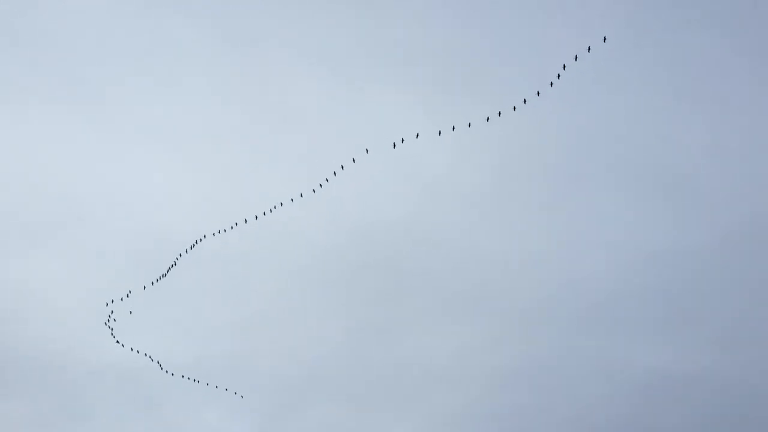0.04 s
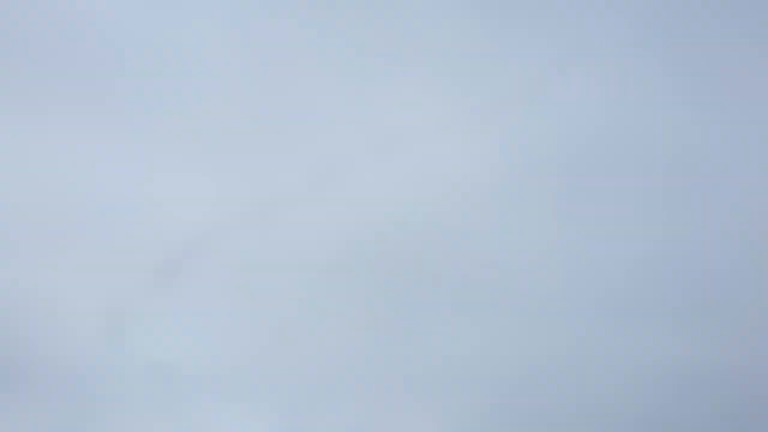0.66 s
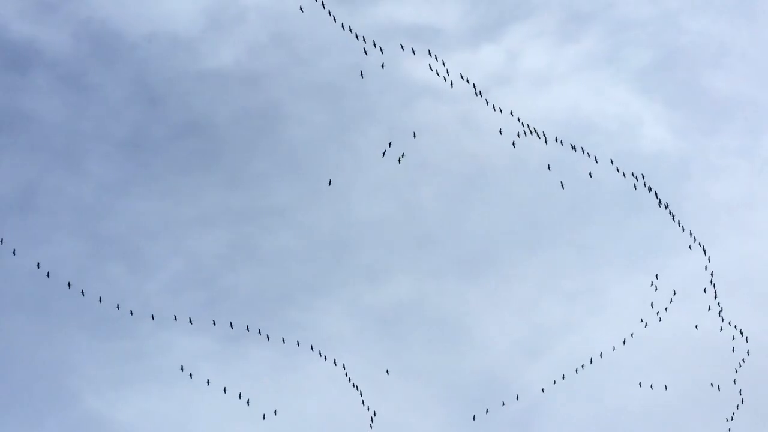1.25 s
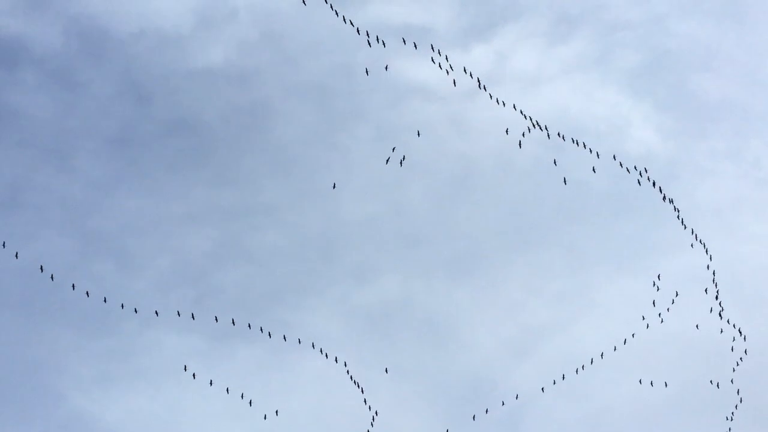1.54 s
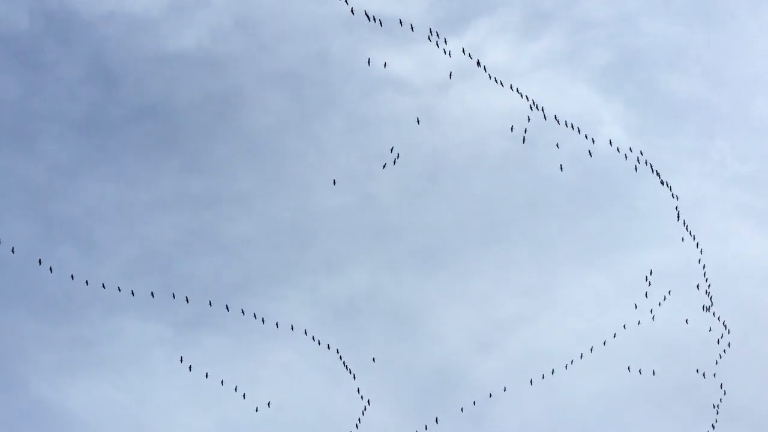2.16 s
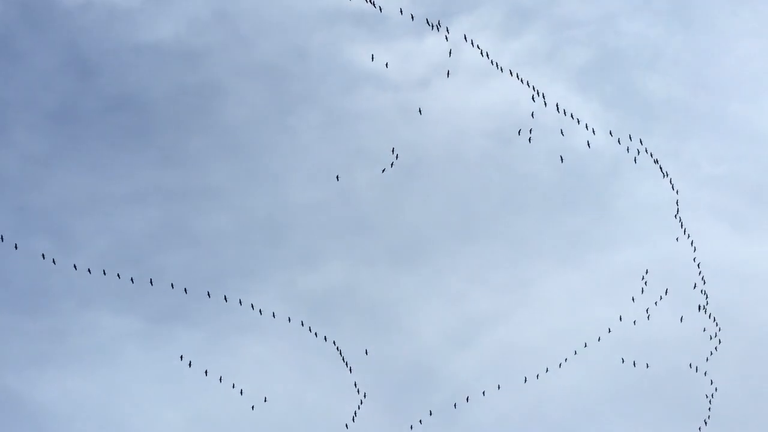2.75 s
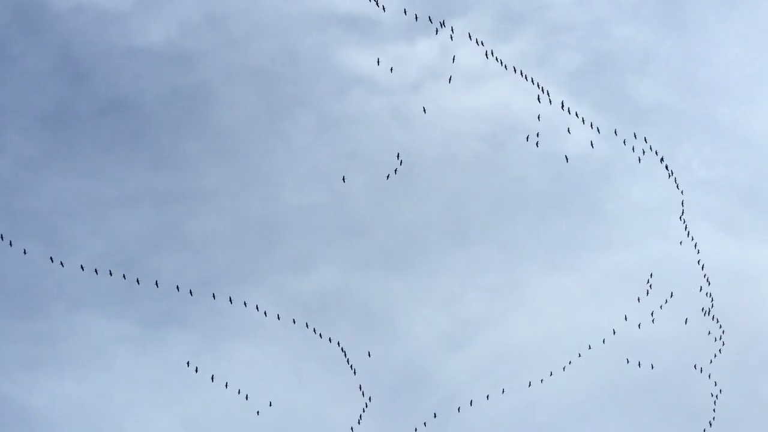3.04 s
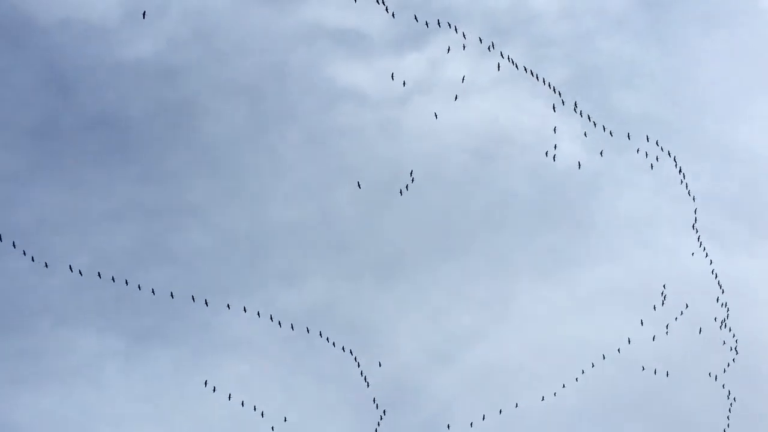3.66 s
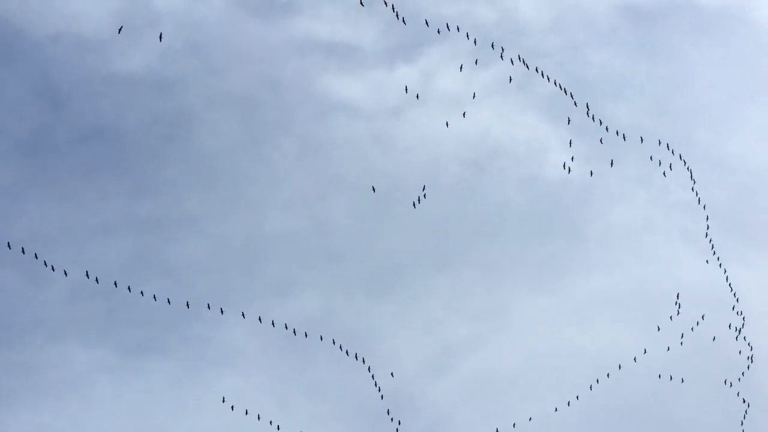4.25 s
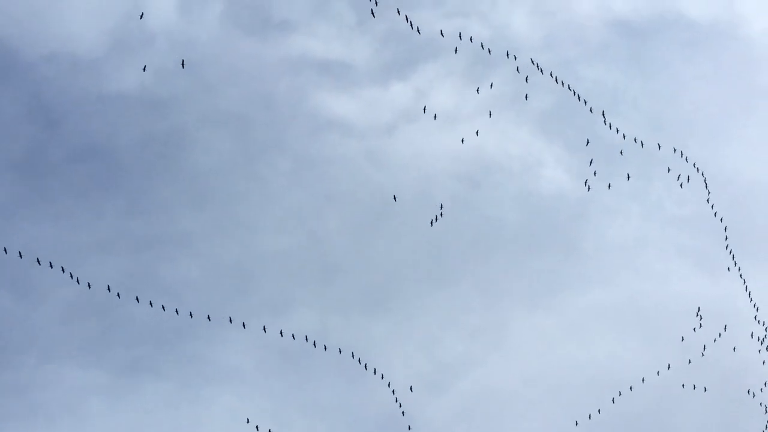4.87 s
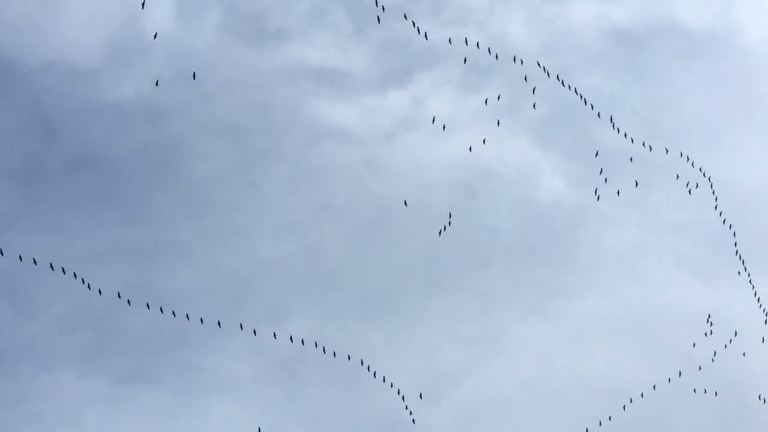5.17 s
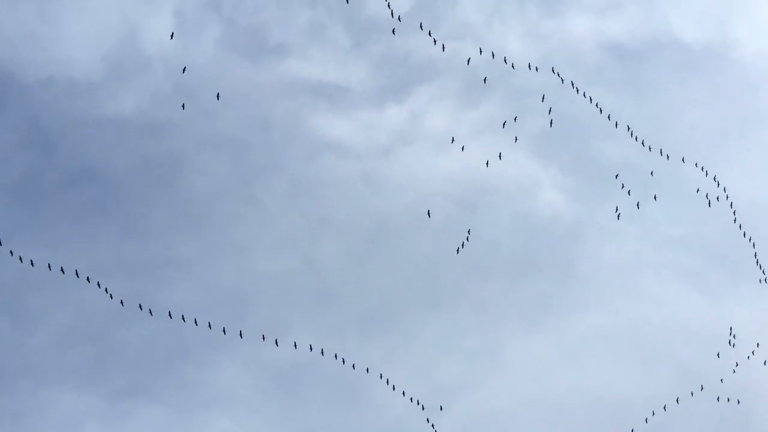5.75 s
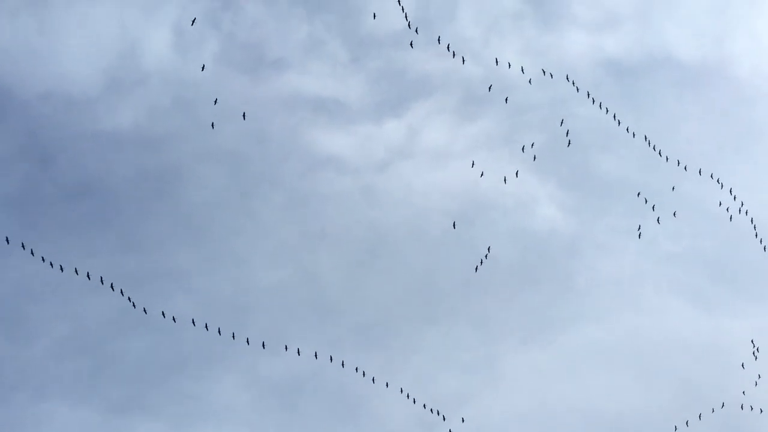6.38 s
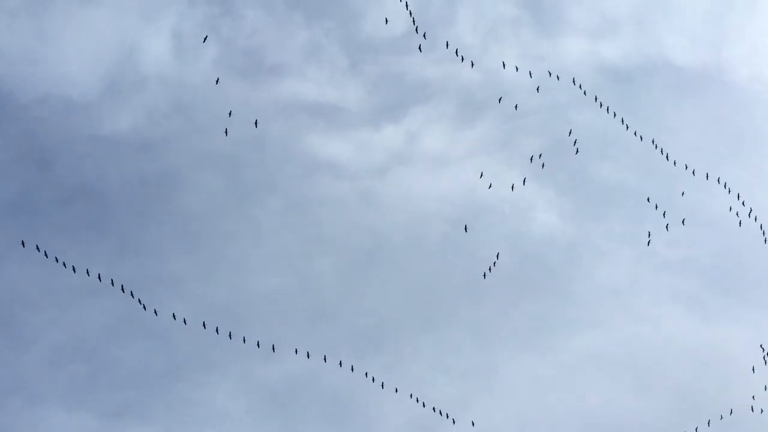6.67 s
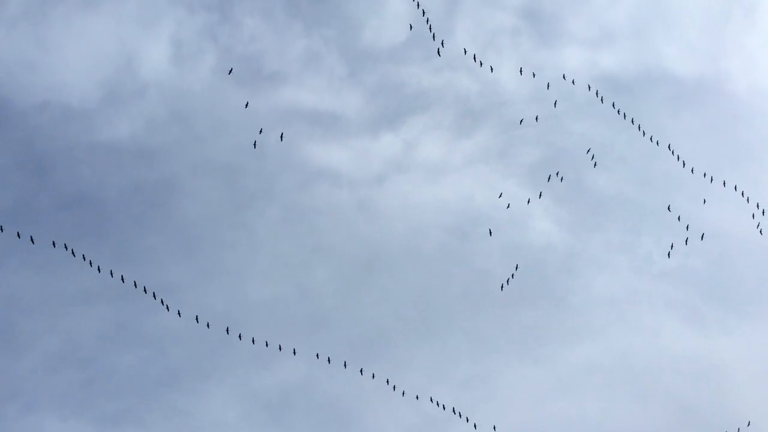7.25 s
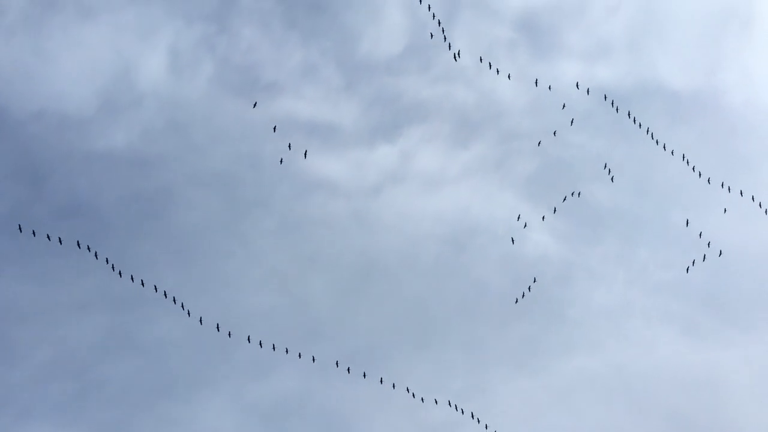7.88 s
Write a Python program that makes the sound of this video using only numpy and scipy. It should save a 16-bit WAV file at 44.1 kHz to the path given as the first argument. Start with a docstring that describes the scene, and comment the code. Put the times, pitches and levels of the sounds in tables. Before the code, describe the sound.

Heard from the ground outdoors, distant cranes trumpet over a low rumble of light wind, a faint engine hum and a steady airy hiss. Soft, slightly falling honks come first, then short rattling rolls and sharp yelps join in uneven bursts, with occasional faint, high peeps. The far flock forms a blurred chorus that rises and falls, and the calling becomes busier in the second half.

```python
"""Cranes trumpet high overhead: gliding honks, quick rolls and lone yelps, with the thin whistles of
young birds between them. Each adult call is a buzz of membranes in the syrinx, coloured by the
windpipe, and frays into rasp when they flap unevenly. The far flock blurs into a chorus and the land
returns a faint echo. Light wind, a distant engine drone and a soft hiss lie underneath."""
import sys
import numpy as np
from scipy import signal
from scipy.fft import rfft, irfft, next_fast_len
from scipy.io import wavfile

SR = 44100
rng = np.random.default_rng(int(sys.argv[2]) if len(sys.argv) > 2 else 0)


def store_pcm(level_fs):
    """Save levels as 16-bit WAV."""
    pcm = np.round(np.clip(level_fs, -1, 1) * 32767).astype(np.int16)
    wavfile.write(sys.argv[1], SR, np.atleast_2d(pcm).T)


N = 349272
TIME = np.arange(N) / SR

# Honks of the nearer birds. Each row: start in seconds, length in seconds, top pitch in Hz, closing
# fall as a share of pitch, roughness from 0 to 1, level in dB, second and upper harmonics in relative
# dB, windpipe resonance in Hz.
HONK_CUES = [(0.0, 0.15, 1060, 0.052, 0.54, -51, -19.5, -29, 3200),
             (0.247, 0.099, 1034, 0.055, 0.42, -48.5, -25, -31, 3200),
             (0.361, 0.22, 1010, 0.065, .5, -50, -32, -33, 3100),
             (.378, .22, 927, .08, 0.6, -53, -14, -27, 3000),
             (.47, 0.13, 825, 0.039, 0.13, -52.5, -15, -30, 3200),
             (.585, 0.18, 817, 0.048, 0.23, -54, -7.5, -26.5, 3470),
             (0.762, 0.16, 788, 0.058, 0.6, -57, -16, -26, 3260),
             (0.818, 0.32, 1008, 0.072, 0.64, -54, -38, -25, 3200),
             (1.114, 0.038, 790, .11, .35, -57, -18, -17.5, 3100),
             (1.308, 0.083, 1212, .06, 0.53, -50.5, -34, -38, 3300),
             (1.332, 0.064, 871, 0.072, 0.27, -49, -5, -32, 3300),
             (1.381, 0.077, 793, 0.22, 0.4, -55, -16, -28, 3300),
             (1.617, 0.12, 881, 0.055, 0.9, -57, -6, -23, 3170),
             (1.706, 0.057, 766, 0.063, .2, -55.5, 1, -19.5, 3200),
             (1.953, 0.16, 767, 0.09, 0.7, -54.5, -3.5, -20.5, 3300),
             (2.054, 0.22, 1103, 0.075, .06, -37.5, -12.5, -25, 3550),
             (2.253, 0.055, 742, 0.22, 0.56, -54.5, -7, -24, 3200),
             (2.581, 0.084, 854, 0.018, 0.54, -52, -2.5, -12, 3100),
             (2.705, 0.091, 844, .08, 0.3, -54, -1.5, -5, 3150),
             (2.689, 0.098, 1079, 0.031, .4, -47, -30, -16, 3320),
             (2.957, 0.14, 1019, 0.018, 0.22, -50.5, -9.5, -20, 3840),
             (2.947, 0.13, 817, 0.12, 0.44, -51, -13, -29, 3300),
             (3.059, 0.12, 1093, 0.029, 0.5, -48.5, -12, -32, 3200),
             (3.05, 0.082, 846, 0.12, 0.6, -62, -5, -31, 3220),
             (3.145, 0.21, 1101, 0.078, 0.15, -39.5, -16, -24.5, 3100),
             (3.184, 0.087, 1010, .11, .08, -47, -8, -27, 3200),
             (4.033, 0.053, 925, 0.043, 0.6, -52, -7, -16, 3200),
             (4.251, 0.059, 952, 0.038, 0.26, -46.5, -3, -10.5, 2800),
             (4.284, 0.2, 1084, 0.04, 0.18, -45.5, -16, -24, 3320),
             (4.297, 0.21, 975, 0.053, 0.83, -48, -28, -23.5, 3140),
             (4.997, 0.097, 1005, .025, 0.07, -49.5, -4.5, -19, 3100),
             (5.124, 0.086, 881, 0.12, 0.42, -50.5, -3, -15, 3160),
             (5.486, .09, 1290, 0.044, 0.9, -50.5, -21, -20, 3300),
             (5.516, 0.27, 1103, 0.052, 0.25, -43.5, -19.5, -21.5, 3200),
             (5.557, 0.054, 905, .03, 0.3, -52, 8, -14, 3200),
             (5.625, 0.092, 948, 0.017, 0.6, -52.5, 0, -10, 3220),
             (5.708, 0.12, 1000, 0.044, 0.17, -49.5, -1, -35, 3300),
             (5.801, .125, 1031, 0.041, 0.37, -51.5, -8, -33, 3300),
             (5.913, 0.074, 1040, 0.144, 0.3, -48, -10.5, -27, 3880),
             (5.985, 0.065, 854, 0.048, 0.14, -52, -3, -18, 3200),
             (6.085, 0.11, 854, 0.045, 0.37, -53, -2, -22, 3300),
             (6.234, 0.098, 1025, 0.072, .3, -50, -15, -28, 3800),
             (6.263, 0.11, 876, 0.047, .4, -53, -11, -35, 3300),
             (6.581, 0.28, 1097, 0.039, .2, -48, -18, -15.5, 2950),
             (6.627, 0.083, 873, 0.12, 0.5, -53, -7, -18, 3200),
             (6.789, 0.13, 1051, 0.039, 0.4, -48, -19, -28, 3300),
             (6.86, 0.14, 1171, 0.043, 0.54, -50, -20, -29, 3270),
             (6.93, .15, 839, 0.034, 0.35, -54.5, -3, -28, 3300),
             (7.039, 0.15, 836, 0.18, 0.54, -49.5, -8.5, -26, 3230),
             (7.4, 0.051, 794, 0.045, 0.27, -52, -5.5, -17.5, 3360),
             (7.506, 0.065, 981, 0.038, 0.18, -41, -27, -37, 3330),
             (7.55, 0.05, 826, 0.15, 0.47, -53.5, -13, -18, 3300),
             (7.672, 0.089, 1086, 0.013, 0.48, -38.5, -21, -22.5, 3160),
             (7.716, 0.16, 1092, 0.033, 0.27, -40.5, -22, -23, 3120),
             (7.723, 0.15, 1238, 0.047, 0.54, -44, -33, -24, 3300),
             (7.8, 0.095, 828, .06, 0.43, -50.5, -7, -20, 3200),
             (7.824, .11, 1205, 0.022, .17, -42, -21, -18, 3360)]
# Rolled calls. Each row: start in seconds, syllable count, spacing in seconds, target pitch in Hz,
# roughness from 0 to 1, relative level in dB, swell from first to last in dB, brightness in dB,
# windpipe resonance in Hz.
ROLL_CUES = [(1.259, 2, 0.039, 1223, 0.42, -47, 3.5, -14, 3300),
             (1.963, 3, 0.041, 1100, 0.36, -52.5, 6, 13, 3400),
             (3.012, 4, .045, 1114, 0.42, -47.5, 2, -1.5, 3400),
             (4.072, 4, .051, 1087, .45, -42, -2, 5.5, 3000),
             (5.387, 4, .04, 1098, 0.06, -43.5, 0, -1, 2960),
             (5.806, 2, 0.059, 1116, .35, -47.5, -5, -8, 3200),
             (6.532, 2, 0.057, 1130, 0.09, -37, 1, -14, 3200)]
# Lone, down-slurred yelps. Each row: start in seconds, length in seconds, middle pitch in Hz, fall as a
# share of pitch, roughness from 0 to 1, level in dB, second and upper harmonics in relative dB.
YELP_CUES = [(2.531, 0.033, 975, .04, 0.2, -52.5, -26, -16), (2.575, 0.019, 910, 0.13, 0.5, -52, -7, -13),
             (2.645, .032, 969, 0.066, 0.6, -44.5, -12, -10),
             (2.683, 0.044, 950, 0.091, .65, -46.5, -8, -4.5),
             (2.779, 0.018, 967, 0.09, 0.5, -45, -14, -11),
             (2.826, 0.03, 1063, 0.095, 0.3, -46.5, -29, -5.5),
             (2.861, 0.023, 940, 0.14, 0.4, -48.5, -18, -12),
             (2.88, 0.042, 797, 0.067, 0.46, -53.5, -7, -5),
             (3.887, 0.071, 906, 0.074, 0.42, -46, -20, -18),
             (3.956, 0.039, 912, 0.057, 0.65, -48.5, -15, -18.5),
             (4.006, 0.031, 902, 0.11, 0.7, -45.5, -18, -12.5),
             (4.084, 0.046, 923, 0.074, .5, -46.5, -6, -3.5), (4.116, 0.042, 934, 0.064, .38, -46, 0, 0),
             (4.173, 0.037, 933, .07, 0.33, -49, -5, -1.5), (4.229, 0.041, 910, 0.024, 0.46, -50.5, -2, 2),
             (4.988, 0.037, 1016, 0.13, 0.7, -45, -23, -14.5),
             (5.018, 0.044, 1052, 0.065, 0.54, -50.5, -26, -7),
             (5.059, 0.032, 960, 0.085, 0.6, -41.5, -17, -18),
             (5.106, 0.028, 1084, 0.043, .3, -43, -23, -7.5),
             (5.124, 0.027, 958, 0.062, 0.14, -38.5, -20, -16),
             (5.153, 0.079, 985, 0.077, 0.48, -46.5, -19, -18),
             (5.546, 0.028, 1092, .06, 0.75, -44.5, -17, -14),
             (5.61, .025, 1020, 0.041, 0.6, -45, -22, -12), (5.654, 0.056, 986, .12, 0.7, -46, -10, -19),
             (5.945, 0.053, 828, 0.11, .35, -53.5, -20, -26),
             (5.974, 0.082, 895, 0.19, 0.47, -50.5, -6, -23),
             (6.054, 0.042, 962, 0.076, 0.5, -49, -14, -19), (6.092, .025, 1167, .08, 0.5, -50.5, -24, -24),
             (6.216, 0.021, 1072, 0.05, .15, -41.5, -34, -17),
             (6.283, 0.034, 1046, .06, 0.3, -47, -31, -27),
             (6.345, 0.03, 1075, 0.035, 0.05, -41.5, -25, -20),
             (6.359, 0.058, 890, 0.1, 0.38, -40, -12, -25), (6.425, .05, 956, 0.137, 0.56, -47.5, -16, -17),
             (6.435, 0.038, 774, 0.18, 0.5, -52, -12, -29), (6.489, 0.027, 975, .04, 0, -53.5, -3, -13),
             (6.545, 0.02, 983, 0.048, 0, -47, -9, -15), (7.038, 0.036, 1034, 0.083, 0.65, -50, -18, -14),
             (7.092, 0.032, 1054, 0.11, 0.7, -49.5, -21, -10),
             (7.127, 0.081, 718, 0.086, 0.8, -53.5, -5, -22), (7.151, 0.025, 1020, .06, 0.4, -50, -18, -12),
             (7.195, 0.038, 1027, 0.074, 0.65, -49, -21.5, -18),
             (7.366, 0.021, 1094, 0.033, 0.1, -43, -30, -19),
             (7.381, 0.033, 966, 0.055, 0.36, -38.5, -24, -27),
             (7.432, 0.037, 984, 0.084, 0.42, -41, -19, -19.5),
             (7.496, 0.013, 962, .04, 0.3, -40.5, -19, -28),
             (7.603, 0.023, 1260, 0.031, 0.4, -49, -26, -30),
             (7.646, 0.022, 1070, 0.038, 0.3, -41, -24, -29),
             (7.884, 0.017, 1080, 0.046, .2, -36, -26, -22)]
# A roll's timbre at REFERENCE_HZ and brightness 0. In order, in relative dB: second harmonic, its lift
# at full roughness, upper harmonics.
ROLL_TIMBRE = (-31.5, 24, -13.5)
# How a windpipe resonating at PIPE_HZ colours harmonics three and up. Each row: frequency in Hz, gain
# in dB.
WINDPIPE_EQ = [(2300, -7.5), (2750, 2.5), (3300, 1.5), (3700, 1), (4200, -9), (4700, -15), (5500, -22.5),
               (6500, -25.5)]
# Whistles of young cranes. Each row: start in seconds, length in seconds, middle pitch in Hz, glide
# over the note in Hz, relative level in dB.
WHISTLE_CUES = [(1.344, .055, 3400, -380, -65), (3.441, 0.041, 4150, 300, -62.5),
                (3.474, .11, 3500, -780, -59), (4.334, 0.028, 3500, -470, -61),
                (4.424, 0.034, 3696, -550, -62), (4.532, 0.034, 3620, -700, -68),
                (5.869, 0.03, 4380, 800, -69), (7.112, 0.081, 3960, 607, -68),
                (7.185, .048, 4100, 452, -65), (7.238, 0.081, 3450, -730, -67)]
# The far chorus swelling and ebbing. Each row: time in seconds, relative level in dB.
CHORUS_RIDE = [(0, -61.5), (.5, -53), (1.05, -56), (1.25, -62), (2.45, -64), (2.7, -52.5), (3.2, -56),
               (3.8, -65.5), (4.1, -49), (4.55, -53), (4.9, -57.5), (5.1, -47.5), (5.3, -54), (5.6, -54.5),
               (6.2, -51), (6.8, -48.5), (7.3, -61.5), (7.55, -53), (7.9, -41.5)]
# The wind's rumble. Each row: frequency in Hz, relative level in dB.
WIND_SPECTRUM = [(20, -43), (33, -22), (42, -6.5), (52, -1.5), (80, 0), (100, -5.5), (120, -12.5),
                 (170, -12), (220, -19), (320, -27), (700, -57.5)]
# The wind's strength. Each row: time in seconds, level in dB before buffeting.
WIND_RIDE = [(0, -54), (1.2, -50.5), (1.5, -48.5), (2.1, -46.5), (3.4, -48.5), (5.2, -48.5), (5.9, -46.5),
             (6.8, -45.5), (7.3, -50), (7.9, -45)]
# The engine's tones. Each row: frequency in Hz, width of its wander in Hz, level in dB before the ride.
ENGINE_TONES = [(61.2, 6.436, -47.5), (95.05, 5.98, -53), (187.3, 8.54, -64.5)]
# How well the engine carries. Each row: time in seconds, gain in dB.
ENGINE_RIDE = [(0, -6), (.5, 0), (1.2, -2.5), (1.5, 2), (3.3, -3.5), (3.9, 2), (7.9, -2)]
# The steady hiss of the air. Each row: frequency in Hz, relative level in dB.
AIR_SPECTRUM = [(20, -22), (100, 2.5), (250, -2.5), (400, -4.5), (600, -6.5), (1200, -2.5), (2500, -15.5),
                (5000, -22), (7500, -25.5), (9500, -27.5), (15000, -32.5)]
# The level dips briefly. In order: time in seconds, half width in seconds, depth in dB.
LEVEL_DIP = (1.117, 0.012, -17)

PIPE_HZ, YELP_PIPE_HZ = 3300, 3180  # windpipe resonance of a typical bird and of the yelping birds
# Low voices fall below the windpipe's resonance, so their second harmonic stands out.
REFERENCE_HZ, SECOND_DB_PER_OCTAVE = 1000, -35


def adults(roll_trim_db=-1):
    """The nearer birds call over each other in rolls, honks and yelps."""
    out = np.zeros(N)
    for start, count, spacing, hz, rough, db, swell_db, bright_db, pipe_hz in ROLL_CUES:
        call = roll(count, spacing, hz, rough, swell_db, bright_db, pipe_hz)
        add(out, start, undb(db + roll_trim_db) * call)
    for start, length, hz, fall, rough, db, second_db, upper_db, pipe_hz in HONK_CUES:
        add(out, start, undb(db) * honk(length, hz, fall, rough, second_db, upper_db, pipe_hz))
    for start, length, hz, fall, rough, db, second_db, upper_db in YELP_CUES:
        yelp = syllable(length, hz, fall, rough, second_db, upper_db, YELP_PIPE_HZ,
                        attack=.0074, release=.017)
        add(out, start, undb(db) * yelp)
    return out


def honk(length, hz, fall, rough, second_db, upper_db, pipe_hz, harmonics=6):
    """A held note: it brightens as the pitch arches, then sags and fades as the pressure drops."""
    attack, release = .0065, .04  # seconds
    crest, fade_db, bloom_db = .41, -6, 8  # the pitch crests at this share of the note
    t = np.arange(int((length + release / 2) * SR)) / SR
    slack = ((t / length - crest) / (1 - crest)) ** 2
    pitch = hz * (1 - fall * slack)
    bright_db = bloom_db * (np.sin(np.pi * np.minimum(t / length, 1)) ** 2 - .7)
    voice = syrinx(pitch, rough, second_db + bright_db, upper_db + 1.2 * bright_db, pipe_hz, harmonics)
    # a clear note holds steady; a harsh one swells and dips
    wobble_db = (6 * rough - .4) * flutter(len(t), 32, 21)
    return voice * unit(envelope(t, length, attack, release) * undb(fade_db * slack + wobble_db))


def roll(count, spacing, hz, rough, swell_db, bright_db, pipe_hz, climb=.0133, slur_per_s=1.73):
    """Even, down-slurred syllables climb towards hz; the swell leaves the upper harmonics level."""
    out = np.zeros(int((count * spacing + .1) * SR))
    length = .014 + .041 * rough  # seconds: rasp draws a syllable out
    base_second_db, rough_lift_db, base_upper_db = ROLL_TIMBRE
    for k in range(count):
        pitch = hz * (1 - climb * (count - k))
        db = swell_db * (k - (count - 1) / 2) / max(count - 1, 1)
        tilt_db = bright_db - db
        low_voice_db = SECOND_DB_PER_OCTAVE * np.log2(pitch / REFERENCE_HZ)
        second_db = base_second_db + rough_lift_db * rough + low_voice_db + tilt_db / 2
        upper_db = base_upper_db + tilt_db
        beat = syllable(length, pitch, slur_per_s * length, rough, second_db, upper_db, pipe_hz)
        add(out, k * spacing, undb(db) * beat)
    return out


def syllable(length, hz, fall, rough, second_db, upper_db, pipe_hz,
             attack=.0049, release=.025, fade_db=-5):
    """A yelp or one beat of a roll: a hard attack and a small pitch drop; its rasp rings the windpipe."""
    t = np.arange(int((length + release / 2) * SR)) / SR
    pitch = hz * (1 - fall * (t / length - .5))
    voice = syrinx(pitch, rough, second_db, upper_db - 7.5, pipe_hz)
    ring = rough * undb(upper_db - 3) * flutter(len(t), pipe_hz, width_hz=520)
    return (voice + ring) * unit(envelope(t, length, attack, release) * undb(fade_db * t / length))


def syrinx(hz, rough, second_db, upper_db, pipe_hz, harmonics=6, rasp_hz=88):
    """A trumpet tone; in harsh notes the membranes flap unevenly and harmonics fray into sidebands."""
    n = len(hz)
    jitter = .024 * rough * flutter(n, 61, 54.5)
    waver = .0038 * flutter(n, 0, 30)
    phase = 2 * np.pi * np.cumsum(hz * (1 + jitter + waver)) / SR
    flap = np.exp(.98 * rough * np.tanh(flutter(n, rasp_hz, 56) / .92))
    # a longer or shorter windpipe shifts the whole EQ shape
    uppers_db = [upper_db + np.interp(k * hz * PIPE_HZ / pipe_hz, *np.transpose(WINDPIPE_EQ))
                 for k in range(3, harmonics + 1)]
    tone = 0
    for k, db in enumerate([0, second_db] + uppers_db, 1):
        # higher harmonics break up first
        fray = .48 * rough * (k / 2) ** .52 * flutter(n, k * np.mean(hz), 165 * np.sqrt(k))
        # turbulent air makes each harmonic twinkle on its own, the high ones most
        shimmer_db = 1.38 * k ** .52 * flutter(n, 0, 30)
        tone = tone + unit(np.sin(k * phase) + fray) * undb(db + shimmer_db)
    return unit(tone * flap)


def juveniles(quaver=.022, tremble=.38, hoarse=.18, hoarse_hz=260, trim_db=-1):
    """Young birds peep in thin, hoarse, quavering glides."""
    out = np.zeros(N)
    for start, length, middle_hz, glide_hz, db in WHISTLE_CUES:
        n = int(length * SR)
        progress = np.linspace(0, 1, n)
        hz = (middle_hz + glide_hz * (progress - .5)) * (1 + quaver * flutter(n, 90, 70))
        swell = np.sqrt(progress * (1 - progress)) * np.exp(tremble * flutter(n, 50, 50))
        phase = 2 * np.pi * np.cumsum(hz) / SR + hoarse * flutter(n, hoarse_hz, hoarse_hz)
        add(out, start, undb(db + trim_db) * unit(np.sin(phase) * swell))
    return out


def far_flock(count=210, centre_hz=930, spread=.308, blur_db=-7, trim_db=-.5):
    """Many far birds, dulled by the air and blurred by the land, each rattling at its own pace."""
    out = np.zeros(N)
    for k, (when, span, pace) in enumerate(rng.random((count, 3))):
        hz = centre_hz * np.exp(spread * np.tanh(rng.standard_normal() / 2.3))
        call = honk(.08 + .12 * span, hz, fall=.0979, rough=.43, second_db=-12, upper_db=-24,
                    pipe_hz=PIPE_HZ, harmonics=4)
        rattle_hz = 24 * (.701 + .615 * pace)
        rattle = np.exp(np.cos(2 * np.pi * rattle_hz * np.arange(len(call)) / SR))
        add(out, (k + when) / count * N / SR - .1, call * rattle)
    return unit(out + undb(blur_db) * land_echo(out)) * undb(curve(CHORUS_RIDE) + trim_db)


def bill_and_air(x, low_hz=575, high_hz=6500):
    """An open bill radiates no bass, and the long path through the air absorbs the treble."""
    return signal.sosfilt(signal.butter(4, [low_hz, high_hz], "band", fs=SR, output="sos"), x)


def land_echo(x, t60=1.0, dull_hz=2200, near_s=.03, near_db=5, predelay_s=.005):
    """The ground close by smears each call a little; fields and trees scatter it back, late and dull."""
    t = np.arange(SR) / SR
    decay = np.exp(-np.log(1000) * t / t60) + undb(near_db) * np.exp(-t / near_s)
    tail = rng.standard_normal(SR) * decay * (t > predelay_s)
    tail = signal.sosfilt(signal.butter(2, dull_hz, fs=SR, output="sos"), tail / np.linalg.norm(tail))
    return signal.fftconvolve(x, tail)[:N]


def wind(buffet_db=2):
    """A low rumble rides slow gusts and quick buffeting."""
    return coloured(WIND_SPECTRUM) * undb(curve(WIND_RIDE) + buffet_db * flutter(N, 4.2, 11))


def engine(waver_db=3.6):
    """A far engine drones in low tones, each wavering in pitch and level."""
    drone = 0
    for hz, width_hz, db in ENGINE_TONES:
        phase = 2 * np.pi * np.cumsum(hz + width_hz / 2 * flutter(N, 0, 2.97)) / SR
        drone = drone + undb(db) * unit(np.sin(phase) * undb(waver_db * flutter(N, 0, 2.03)))
    return drone * undb(curve(ENGINE_RIDE))


def air(level_db=-60):
    """Open air lays a soft, steady hiss under everything."""
    return undb(level_db) * coloured(AIR_SPECTRUM)


def flutter(n, hz, width_hz):
    """Unit noise in a bell-shaped band around hz."""
    size = next_fast_len(n + 4096)
    f = np.arange(size // 2 + 1) * SR / size
    band = np.exp(-.5 * ((f - hz) / width_hz) ** 2)
    return unit(irfft(rfft(rng.standard_normal(size)) * band, size))[:n]


def coloured(points):
    """Unit noise shaped by an EQ curve of (Hz, dB) points."""
    hz, db = np.transpose(points)
    size = next_fast_len(N)
    f = np.maximum(np.arange(size // 2 + 1) * SR / size, 1)
    gain = undb(np.interp(np.log(f), np.log(hz), db))
    return unit(irfft(rfft(rng.standard_normal(size)) * gain, size)[:N])


def envelope(t, length, attack, release):
    """Smooth rise, hold, and a smooth fall centred on the end of the note."""
    rise = np.sin(np.pi / 2 * np.clip(t / attack, 0, 1)) ** 2
    fall = np.sin(np.pi / 2 * np.clip((length - t) / release + .5, 0, 1)) ** 2
    return rise * fall


def curve(rows):
    """A fader ride: (seconds, value) points joined by straight lines."""
    return np.interp(TIME, *np.transpose(rows))


def add(out, start, sound):
    """Mix a sound in at a time in seconds."""
    i = max(0, int(start * SR))
    part = sound[:max(0, N - i)]
    out[i:i + len(part)] += part


def undb(db):
    """Decibels to linear gain."""
    return 10 ** (np.asarray(db) / 20)


def unit(x):
    """Scale to an RMS of one."""
    return x / np.sqrt(np.mean(x ** 2) + 1e-18)


def scene(echo_db=-15):
    """The flock and its echo over a bed of wind, engine and air, in mono."""
    flock = bill_and_air(adults() + juveniles() + far_flock())
    return (flock + undb(echo_db) * land_echo(flock) + wind() + engine() + air())[None]


def record(dry, fade_s=.004, top_hz=15300):
    """Short fades at both ends and one brief dip in level, then a steep treble cut."""
    fades = np.minimum(np.minimum(TIME, TIME[-1] - TIME) / fade_s, 1)
    when, half_width, dip_db = LEVEL_DIP
    dip = undb(dip_db * np.maximum(1 - abs(TIME - when) / half_width, 0))
    treble_cut = signal.ellip(10, .2, 60, top_hz, fs=SR, output="sos")
    return signal.sosfilt(treble_cut, dry * fades * dip)


dry = scene()
out = record(dry)
store_pcm(out)
```